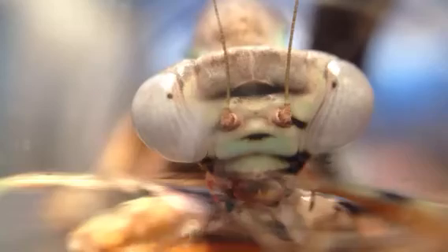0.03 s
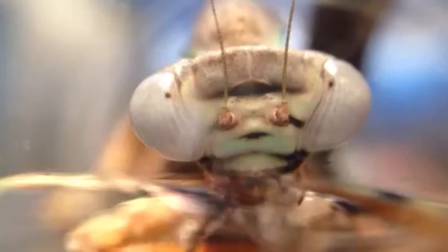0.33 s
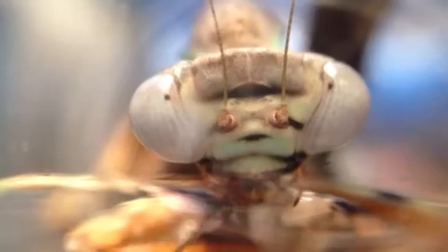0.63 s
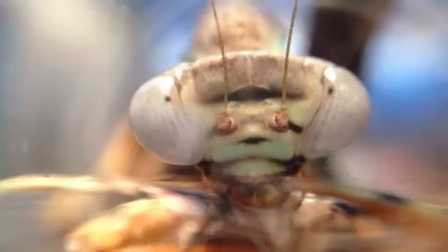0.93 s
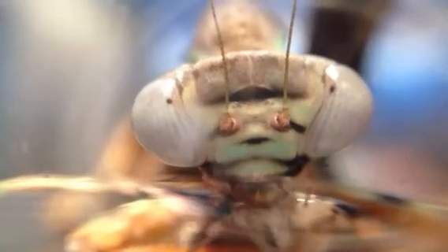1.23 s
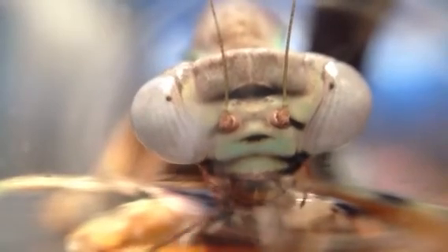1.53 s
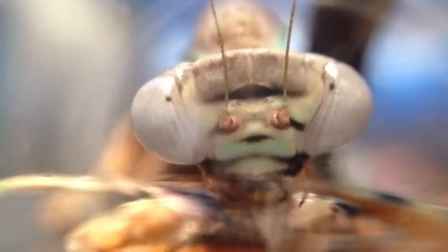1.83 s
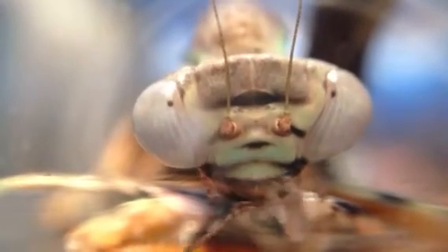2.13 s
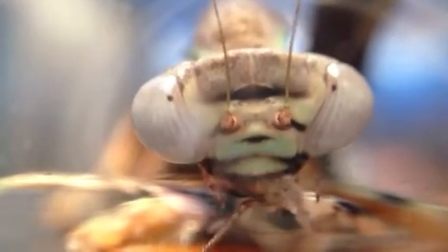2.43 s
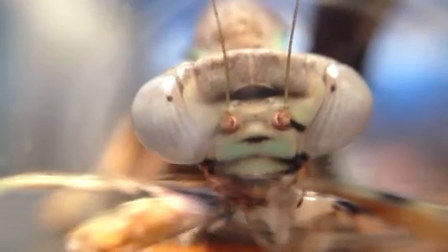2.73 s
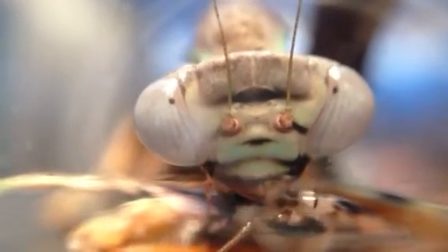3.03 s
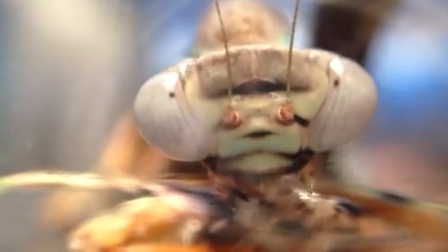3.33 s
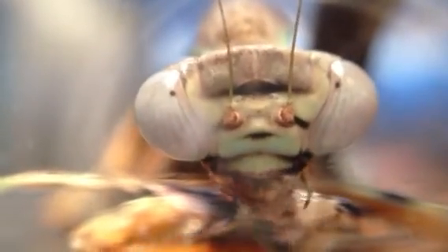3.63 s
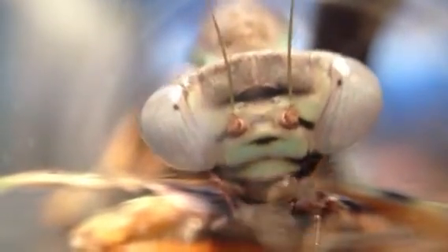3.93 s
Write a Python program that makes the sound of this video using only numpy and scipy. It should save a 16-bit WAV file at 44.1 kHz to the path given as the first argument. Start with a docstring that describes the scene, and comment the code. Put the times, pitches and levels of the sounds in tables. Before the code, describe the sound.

A fan hums low and steady in a quiet room for about four seconds, with a thin buzz and a soft rush of air, slightly stronger in the first second. Handling near the microphone adds a soft bump at the start, faint rustles around 0.2 and 0.7 seconds, small low bumps between 2.1 and 2.7, and another brief rustle near 3.4. Light hiss lies underneath.

```python
"""A steady low hum and a soft rush of air: a mains-powered fan running in a quiet room.
The motor's iron hums on multiples of the mains rate, with a thin buzz from the windings on top,
and the rotor adds weak tones that beat against the hum. Moving air rumbles, rushes and rings in
the housing, the rush and ring a little stronger at first. Handling near the microphone makes
a few faint rustles and soft low bumps, all over an even microphone hiss."""
import sys
import numpy as np
from scipy.fft import rfft, irfft
from scipy.io import wavfile

SR = 44100
rng = np.random.default_rng(int(sys.argv[2]) if len(sys.argv) > 2 else 0)


def dump_mix(stems):
    """Bounce the given channels to the path in sys.argv[1] as a 16-bit WAV at rate SR."""
    frames = np.atleast_2d(stems).T  # one column per channel
    limited = np.clip(frames, -1, 1)  # hard clip at full scale
    pcm = np.round(limited * 32767).astype(np.int16)
    wavfile.write(sys.argv[1], SR, pcm)


N = 176400

MAINS_HZ, ROTOR_HZ = 49.966, 29.98
WAVER_PER_S, FLUTTER_PER_S = 1.5, 15   # tones waver slowly, air flutters fast
START_S, FADE_IN_S, CUTOFF_HZ = .12, .0024, 15300


def from_db(db):
    """Decibels to gain."""
    return 10 ** (np.asarray(db) / 20)


def seconds():
    """Time of every sample."""
    return np.arange(N) / SR


def bin_hz():
    """Frequency of every spectral bin, floored at 1 Hz."""
    return np.maximum(np.arange(N // 2 + 1) * SR / N, 1)


def drift(rate):
    """Smooth random motion with spread 1, changing about rate times a second."""
    hz = np.arange(N // 2 + 1) * SR / N
    slow = irfft(rfft(rng.standard_normal(N)) / (1 + (hz / rate) ** 2) ** 2, N)
    return (slow - slow.mean()) / slow.std()


def noise(gain):
    """Noise with the given amplitude per root Hz in every bin."""
    return irfft(rfft(rng.standard_normal(N)) * gain, N) * np.sqrt(SR / 2)


def colour(points):
    """An EQ curve: gain per bin from (Hz, dB) points joined on a log-frequency axis."""
    hz, db = np.transpose(points)
    return from_db(np.interp(np.log(bin_hz()), np.log(hz), db))


def tones(base_hz, partials, waver_db):
    """Sines on multiples of one rate, each wavering slowly in level."""
    out = np.zeros(N)
    for multiple, db in partials:
        cycles = round(multiple) * base_hz * seconds() + rng.random()
        amplitude = np.sqrt(2) * from_db(db + waver_db * drift(WAVER_PER_S))
        out += amplitude * np.sin(2 * np.pi * cycles)
    return out


def swells(events, spectrum):
    """Short bursts of coloured noise that rise and fall smoothly."""
    envelope = sum(from_db(db) * np.exp(-2 * ((seconds() - peak_s) / length_s) ** 2)
                   for peak_s, length_s, db in events)
    return envelope * noise(colour(spectrum))


def handling():
    """Handling near the microphone: faint bright rustles and soft low bumps."""
    # The touches. Each row: peak time in seconds, length in seconds, gain in dB.
    rustles = [(.24, 0.056, -6), (.655, 0.069, -2), (3.355, 0.036, 0)]
    bumps = [(.155, 0.047, 6), (2.15, 0.036, -5), (2.45, .04, -6), (2.655, .04, 3)]
    # Their colours. Each row: frequency in Hz, level in dB per Hz before that gain.
    rustle_eq = [(1000, -112), (2600, -101), (3500, -94), (4800, -105), (7000, -120), (12000, -135)]
    bump_eq = [(15, -108), (35, -101), (80, -88), (130, -93), (300, -115), (1000, -150)]
    return swells(rustles, rustle_eq) + swells(bumps, bump_eq)


def air_rumble():
    """Moving air lays down a low bed of noise with a light flutter."""
    # The rumble's colour. Each row: frequency in Hz, level in dB per Hz before the gain.
    rumble_eq = [(20, -122), (40, -111), (62, -101), (80, -89), (95, -87.5), (109, -76.5), (126, -80.5),
                 (148, -74), (185, -73.5), (225, -80), (330, -86), (420, -92.5), (900, -118)]
    gain = from_db(-3 + 1.44 * drift(FLUTTER_PER_S))
    return gain * noise(colour(rumble_eq))


def airflow():
    """Strength of the flow in dB about its mean: higher at first, always fluttering."""
    # The flow's contour. Each row: time in seconds, relative level in dB.
    contour = [(0.22, -54), (0.38, -55), (0.6, -55), (0.9, -55.5), (1.35, -57.5), (2.3, -56.5), (3.1, -58),
               (3.75, -59)]
    times, levels = np.transpose(contour)
    flow_db = np.interp(seconds(), times, levels)
    return flow_db - flow_db.mean() + .5 * drift(FLUTTER_PER_S)


def air_rush(flow_db):
    """The broad rush of moving air, riding gently on the flow."""
    # The rush's colour. Each row: frequency in Hz, level in dB per Hz before the gain.
    rush_eq = [(200, -105), (480, -95), (700, -96), (1100, -101), (1600, -99), (2050, -99), (2200, -102),
               (2500, -99), (3200, -104), (3700, -103), (4900, -106), (6500, -117), (12000, -130)]
    gain = from_db(.5 + .54 * flow_db)
    return gain * noise(colour(rush_eq))


def housing_ring(flow_db):
    """Air rings the housing's resonances, which rise steeply with the flow."""
    # Each row: centre in Hz, half-width in Hz, peak in dB per Hz before the gain.
    resonances = [(521, 40, -95.5), (908, 46, -94.5), (1263, 32, -95.5), (1329, 37, -88), (1402, 40, -90),
                  (1450, 43, -96), (1526, 42, -94), (1687, 20, -94), (1822, 70, -94), (2030, 35, -99.5),
                  (2007, 44, -95.5), (2350, 92, -102), (2666, 33, -98.5), (2800, 153, -99),
                  (3520, 130, -106)]
    power = sum((from_db(peak_db) / (1 + ((bin_hz() - hz) / width) ** 2)) ** 2
                for hz, width, peak_db in resonances)
    gain = from_db(.5 + 1.8 * flow_db)
    return gain * noise(np.sqrt(power))


def rotor_tones():
    """Weak tones on multiples of the turning rate, beating against the hum."""
    # Each row: multiple of the turning rate, level in dB.
    partials = [(6, -67.5), (7, -68), (8, -75), (9, -88), (12, -81)]
    return tones(ROTOR_HZ, partials, waver_db=3)


def winding_buzz():
    """The windings buzz thinly on high multiples of the mains rate."""
    # Each row: multiple of the mains rate, level in dB.
    partials = [(15, -89), (19, -88), (20, -85), (23, -82.5), (24, -85.5), (27, -84), (29, -79.5),
                (34, -92), (36, -93), (42, -85), (43, -92), (53, -86), (55, -92), (56, -77), (57, -88.5),
                (71, -91), (72, -81), (81, -98), (82, -89), (83, -97), (88, -102), (93, -91)]
    return tones(MAINS_HZ, partials, waver_db=1.2)


def iron_hum():
    """The motor's iron hums on low multiples of the mains rate."""
    # Each row: multiple of the mains rate, level in dB before the gain.
    partials = [(3, -68), (4, -51.5), (5, -75), (6, -64), (7, -72), (8, -84), (10, -85), (11, -83)]
    gain = from_db(1.5 - .5 * seconds())   # sags half a dB a second
    return gain * tones(MAINS_HZ, partials, waver_db=.3)


def scene():
    """The fan's motor and air with the faint handling sounds, in mono."""
    motor = iron_hum() + winding_buzz() + rotor_tones()
    flow_db = airflow()
    air = air_rumble() + air_rush(flow_db) + housing_ring(flow_db)
    return (motor + air + handling())[None]


def record(dry):
    """The microphone adds hiss, the sound cuts in, and the top treble is cut off."""
    # The nearly flat hiss. Each row: frequency in Hz, level in dB per Hz.
    hiss_eq = [(500, -111), (6500, -110), (10000, -110.2), (12500, -110.8), (14300, -109.7), (15300, -111)]
    fade_in = np.clip((seconds() - START_S) / FADE_IN_S, 0, 1)
    live = (dry + noise(colour(hiss_eq))) * fade_in
    high_cut = np.clip((CUTOFF_HZ - bin_hz()) / 100 + .5, 0, 1)   # closes over 100 Hz
    return irfft(rfft(live) * high_cut, N)


dry = scene()
out = record(dry)
dump_mix(out)
```